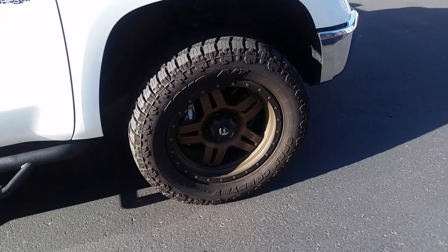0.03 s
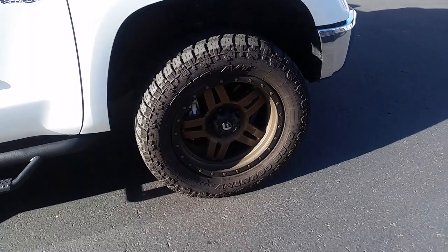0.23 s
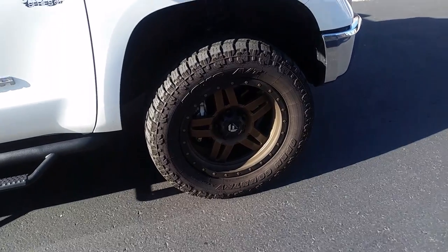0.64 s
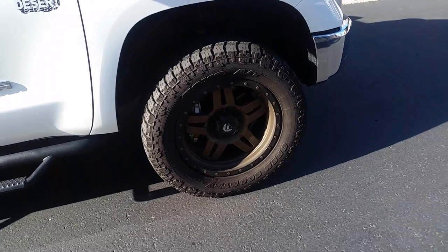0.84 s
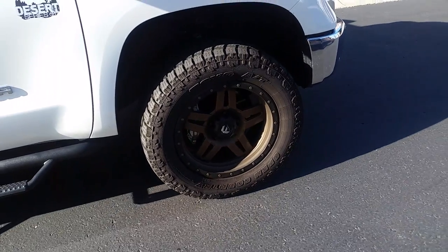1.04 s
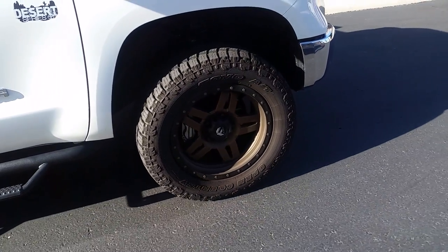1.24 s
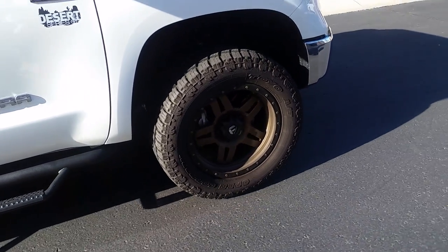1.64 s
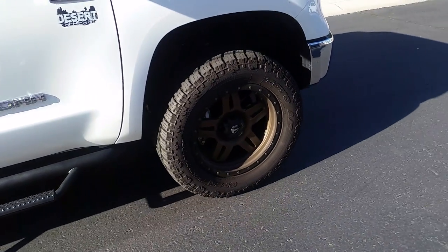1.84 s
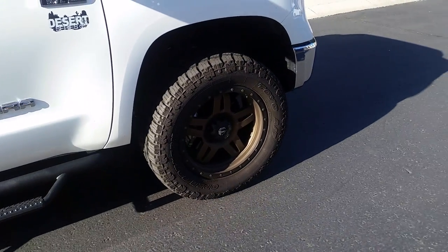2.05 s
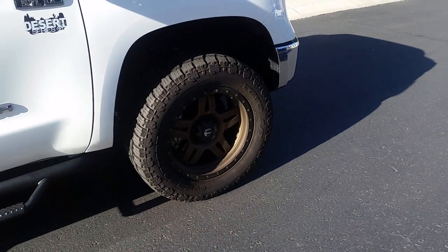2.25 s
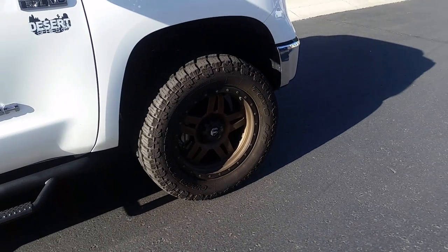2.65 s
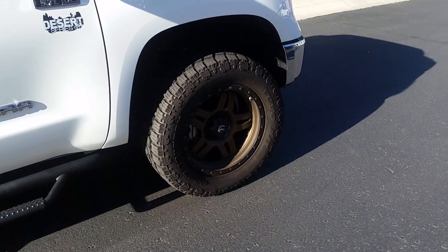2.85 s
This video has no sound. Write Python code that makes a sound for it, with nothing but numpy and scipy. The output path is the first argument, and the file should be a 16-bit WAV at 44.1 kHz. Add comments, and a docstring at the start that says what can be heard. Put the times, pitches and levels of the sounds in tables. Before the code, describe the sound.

A loose metal joint clunks once at a pickup's front wheel. Heard close by outdoors over the idling engine, wind first pops on the microphone, then the tyre scrubs briefly and the suspension thuds before the rattling clunk.

```python
"""A loose metal joint clunks and rattles out at the front wheel of a pickup creeping over asphalt.
Heard from beside the wheel, over the idling engine: exhaust hum, rumble, fan rush, thin hiss.
First grit snaps and wind puffs pop on the microphones; then the tyre scrubs and the suspension thuds.
Dense metal contacts ring the joint, and the running noise sinks."""
import sys
import numpy as np
from scipy import signal
from scipy.fft import rfft, irfft
from scipy.io import wavfile
from scipy.ndimage import uniform_filter1d, minimum_filter1d

SR = 44100
rng = np.random.default_rng(int(sys.argv[2]) if len(sys.argv) > 2 else 0)


def dump_mix(stems):
    """Bounce the given channels to the path in sys.argv[1] as a 16-bit WAV at rate SR."""
    frames = np.atleast_2d(stems).T  # one column per channel
    limited = np.clip(frames, -1, 1)  # hard clip at full scale
    pcm = np.round(limited * 32767).astype(np.int16)
    wavfile.write(sys.argv[1], SR, pcm)


N = 132300
T = np.arange(N) / SR

# stereo image of engine, eddies and grit: (frequency [Hz], L-R correlation [-])
AMBIENT_IMAGE = [(60, 0.87), (120, 0.89), (240, 0.94), (480, 0.91), (950, 0.84), (1890, 0.21), (3770, 0.32),
                 (7520, -0.52), (15000, 0.62)]
# stereo image of scrub, suspension and joint: (frequency [Hz], L-R correlation [-])
WHEEL_IMAGE = [(60, 0.69), (130, 0.95), (290, 0.7), (640, 1), (1410, 0.63), (3100, -0.0049), (6820, -0.058),
               (15000, -0.11)]


def from_db(db):
    """Decibels to gain."""
    return 10 ** (np.asarray(db) / 20)


def unit_rms(x):
    """Scale to rms 1."""
    return x / np.sqrt(np.mean(x ** 2) + 1e-20)


def in_time(rows):
    """Time table, read at every sample."""
    return np.interp(T, *np.transpose(rows))


def at_bins(rows):
    """Table over log frequency, read at every FFT bin."""
    hz, value = np.transpose(rows)
    return np.interp(np.log(np.arange(N // 2 + 1) * SR / N + 1e-3), np.log(hz), value)


def colour(x, spectrum):
    """Minimum-phase filter with the given spectrum."""
    cepstrum = irfft(np.log(from_db(at_bins(spectrum))), N)
    cepstrum[1:N // 2] *= 2
    cepstrum[N // 2 + 1:] = 0
    return irfft(rfft(x) * np.exp(rfft(cepstrum)), N)


def butter(x, hz, kind, order=2):
    """High- or low-pass."""
    return signal.lfilter(*signal.butter(order, hz, kind, fs=SR), x + 1e-18)


def spread(pair, image):
    """Two independent signals to left and right with the given correlation."""
    correlation = np.clip(at_bins(image), -.99, .99)
    mid, side = rfft(pair)
    return irfft(np.sqrt(1 + correlation) * mid + np.sqrt(1 - correlation) * side * [[1], [-1]], N)


def noise(spectrum, image):
    """Coloured stereo noise, rms 1."""
    return unit_rms(colour(spread(rng.standard_normal((2, N)), image), spectrum))


def pan(left_over_right_db):
    """Constant-power left and right gains."""
    db = np.atleast_1d(left_over_right_db)
    gains = from_db(np.array([db, -db]) / 2)
    return gains / np.sqrt(np.sum(gains ** 2, axis=0))


def drift(corner_hz):
    """Slow random wander, rms 1."""
    hz = np.arange(N // 2 + 1) * SR / N
    return unit_rms(irfft(rfft(rng.standard_normal(N)) / (1 + (hz / corner_hz) ** 2), N))


def ring(x, hz, t60_s):
    """Resonator: a unit click gives a decaying sine of height 1."""
    r, w = from_db(-60 / (t60_s * SR)), 2 * np.pi * hz / SR
    return signal.lfilter([0, np.sin(w)], [1, -2 * r * np.cos(w), r * r], x + 1e-18)


def resonances(x, modes, t60_s):
    """Modes driven by x, levels relative to x."""
    return x.std() * sum(from_db(db) * unit_rms(ring(x, hz, t60_s)) for hz, db in modes)


def bell(centre_s, sigma_s):
    """Gaussian of height 1."""
    return np.exp(-.5 * ((T - centre_s) / sigma_s) ** 2)


def bursts(rows, attack_s=0.0014):
    """Power sum of decaying envelopes: (time [s], level [dB], t60 [s])."""
    power = 0
    for s, db, t60_s in rows:
        rise = np.clip((T - s) / attack_s, 0, 1)
        power += (rise * from_db(db - 60 * np.maximum(T - s, 0) / t60_s)) ** 2
    return np.sqrt(power)


def rumble():
    """Low noise of the running truck."""
    spectrum = [(15, -55), (28, -6), (45, -13), (62, -4.5), (85, 0.5), (113, -1), (150, -6.5), (200, -10.5),
                (270, -12.5), (380, -18.5), (500, -25.5), (800, -55)]  # (frequency [Hz], density [dB])
    levels = [(0, -29.5), (1.7, -34.5), (2.05, -27), (2.4, -29), (2.65, -30.5), (2.8, -39.5), (3, -35)]  # (time [s], level [dB])
    return noise(spectrum, AMBIENT_IMAGE) * from_db(in_time(levels))


def exhaust():
    """Hum on multiples of the firing rate, each fluttering in level and phase."""
    firing = [(0, 43.29), (.9, 43.29), (1.3, 42.24), (1.8, 41.8), (2.1, 41.81), (2.5, 44.36), (3, 45.3)]  # (time [s], firing rate [Hz])
    orders = [(1, -19), (2, -0.5), (3, -15), (4, -17), (5, -25.5), (6, -22), (7, -26), (8, -31.5), (9, -24),
              (10, -29), (11, -45)]  # (multiple of firing rate [-], level [dB])
    levels = [(0, -31.5), (.5, -28.5), (.9, -31.5), (1.8, -26.5), (2.3, -30), (2.65, -32.5), (2.9, -32),
              (3, -40.5)]  # (time [s], level [dB])
    firing_phase = 2 * np.pi * np.cumsum(in_time(firing)) / SR
    hum = 0
    for order, db in orders:
        flutter = 0.04 if round(order) == 2 else 0.21
        angle = round(order) * firing_phase + rng.uniform(0, 2 * np.pi)
        in_phase = (1 + flutter * drift(24)) * np.sin(angle)
        quadrature = flutter * drift(4.1) * np.cos(angle)
        hum += from_db(db) * (in_phase + quadrature)
    return np.sqrt(2) * hum * from_db(in_time(levels)), firing_phase


def fan(firing_phase):
    """Rush of fan and belts with engine bay resonances, throbbing with the firing; thin hiss on top."""
    rush_spectrum = [(240, -24.5), (400, 5.5), (416, -9.5), (615, -6), (798, -2), (863, -5.5), (996, -6),
                     (1380, -3.5), (1530, -8), (2070, -5), (2380, -7.5), (2610, -6.5), (3480, -15.5),
                     (3810, -14), (4570, -16), (5010, -26), (6170, -32.5), (7400, -55.5), (9000, -57.5),
                     (11700, -58), (19800, -120)]  # (frequency [Hz], density [dB])
    hiss_spectrum = [(4000, -63), (7500, -31), (9500, -17), (11000, -7.5), (12500, 1.5), (13800, 5.5),
                     (15000, 10.5), (16000, -5)]  # (frequency [Hz], density [dB])
    levels = [(0, -39), (.5, -40), (1.2, -41), (2.45, -39.5), (2.62, -40), (2.75, -46), (3, -47)]  # (time [s], level [dB])
    bay_modes = [(398, 4.7, -57.5), (866, 12, -58), (1420, 46, -49.5), (2050, 23, -53), (2680, 67, -57.5)]  # (frequency [Hz], bandwidth [Hz], level at peak rush [dB])
    throb_depth, rush_flicker_db = 0.12, 1.02
    hiss_re_rush_db, hiss_flicker_db = -3, 1.8
    rush_db = in_time(levels)
    rush = noise(rush_spectrum, AMBIENT_IMAGE) * from_db(rush_db)
    air = spread(rng.standard_normal((2, N)), AMBIENT_IMAGE)
    bay = sum(from_db(db) * unit_rms(ring(air, hz, t60_s=np.log(1000) / (np.pi * width_hz)))
              for hz, width_hz, db in bay_modes)
    rush += bay * from_db(rush_db - rush_db.max())
    rush += throb_depth * np.sin(firing_phase) * butter(rush, 3600, "low")
    hiss = noise(hiss_spectrum, AMBIENT_IMAGE)
    hiss *= from_db(rush_db + hiss_re_rush_db + hiss_flicker_db * drift(30))
    return rush * from_db(rush_flicker_db * drift(45)) + hiss


def wind_puffs():
    """Pointed pressure dips at a microphone port, swung back by its bass cut; brief eddies follow."""
    puffs = [(0.6038, 1, 0.0015, -19), (0.6732, 15, 0.00076, 31), (0.6785, 1.5, 0.0012, 32),
             (0.7026, 12, 0.0011, 32), (0.7077, 4, 0.0013, 32), (0.724, 0.5, .001, 36),
             (.7690, -7, 0.00093, 30), (.7726, 8, 0.00098, 38)]  # (time [s], level [dB], width [s], pan L-R [dB])
    eddy_spectrum = [(20, 4), (60, 1.5), (150, 0), (400, -15), (1000, -28), (3500, -32.5), (7000, -55.5)]  # air fluttering in the port: (frequency [Hz], density [dB])
    eddy_re_puff_db, eddy_t60_s = -17, 0.043
    dips = eddy_envelope = 0
    for s, db, width_s, pan_db in puffs:
        dips -= from_db(db) * pan(pan_db) / (1 + .5 * ((T - s) / width_s) ** 2) ** 2
        eddy_envelope += pan(pan_db) * bursts([(s, db + eddy_re_puff_db, eddy_t60_s)])
    pops = butter(butter(dips, 79, "high"), 34, "high", order=1)
    return pops + noise(eddy_spectrum, AMBIENT_IMAGE) * eddy_envelope


def microphone_crackle():
    """The left microphone crackles under the strongest puffs."""
    ticks = [(.6748, -2), (.6787, -4), (.6815, -12), (.7072, -6), (.7255, -17)]  # (time [s], peak [dB])
    spectrum = [(200, -8), (900, 19), (2000, 4), (4000, -0.5), (6500, -19.5), (15000, -49)]  # (frequency [Hz], gain [dB])
    sample = np.arange(N)
    clicks = -pan(29) * sum(from_db(db) * (sample == int(s * SR)) for s, db in ticks)
    impulse_peak = np.abs(colour(sample == 0, spectrum)).max()
    return colour(clicks, spectrum) / impulse_peak


def grit(time_s=.379, level_db=-16.5, t60_s=0.016):
    """A piece of grit snaps under the tyre."""
    spectrum = [(300, -29), (900, -18), (1400, 1), (2200, -4), (3000, -20), (5000, -43), (16000, -50)]  # (frequency [Hz], density [dB])
    return pan(17) * noise(spectrum, AMBIENT_IMAGE) * bursts([(time_s, level_db, t60_s)])


def tyre_scrub():
    """Rubber scrubs on asphalt: one short swell of noise."""
    spectrum = [(100, -30), (500, 0), (1050, 4.5), (1700, -6), (2600, 1.5), (5000, -11.5), (8000, -39),
                (16000, -33)]  # (frequency [Hz], density [dB])
    return from_db(-31) * bell(centre_s=1.872, sigma_s=0.022) * noise(spectrum, WHEEL_IMAGE)


def suspension():
    """Soft pushes set tyre and chassis booming and the struts shuddering."""
    thuds = [(1.8947, -11, 0.00076, -32), (1.904, -13, 0.00091, -33), (1.915, -5, 0.0022, -28.5),
             (1.9878, -18, 0.0014, -27), (1.9953, -17, 0.00087, -22), (2.045, -15.5, 0.0017, -33),
             (2.173, -39, 0.0018, -30), (2.225, -29, 0.00051, -35.5), (2.453, -19.5, 0.00049, -29),
             (2.51, -13.5, 0.0014, -36)]  # (time [s], push [dB], contact sigma [s], shudder [dB])
    chassis_modes = [(62, -23, .1), (93, -2, 0.13), (144, -1.5, 0.083), (190, 1, 0.069), (235.6, -1, 0.11),
                     (377, -28, 0.095)]  # (frequency [Hz], level [dB], t60 [s])
    shudder_spectrum = [(60, -10), (200, -0.5), (420, -18), (620, -12), (900, -11), (1400, -24),
                        (2500, -44), (8000, -70)]  # (frequency [Hz], density [dB])
    strut_modes = [(545, -24), (578, -8.5), (645, -10), (752, -10.5), (965, -16)]  # (frequency [Hz], level re shudder [dB])
    shudder_t60_s = 0.14
    pushes = sum(from_db(db) * bell(s, sigma_s) / (sigma_s * SR * np.sqrt(2 * np.pi))
                 for s, db, sigma_s, _ in thuds)
    boom = -sum(from_db(db) * ring(pushes, hz, t60_s) for hz, db, t60_s in chassis_modes)
    shudder = noise(shudder_spectrum, WHEEL_IMAGE)
    shudder *= bursts([(s, db, shudder_t60_s) for s, _, _, db in thuds])
    hollow = resonances(shudder, strut_modes, t60_s=0.088)
    return butter(boom + shudder + hollow, 50, "high")


def loose_joint():
    """Each blow is a dense rattle of contacts that rings the joint, with bright snap and diffuse tail."""
    blows = [(2.4532, -23.5, 0.035, -24.5), (2.4751, -14, 0.13, -13.5), (2.489, -23, 0.098, -30),
             (2.507, -18.5, 0.068, -33), (2.558, -25.5, .12, -34.5)]  # (time [s], level [dB], t60 [s], snap [dB])
    joint_modes = [(586.8, -42.5), (1028, -54), (1281, -41), (1324, -44), (1976, -53), (2089, -39.5),
                   (2245, -44), (2476, -45.5), (2546, -44), (2681, -44), (2918, -64), (3042, -46),
                   (3101, -49.5), (3424, -50)]  # (frequency [Hz], relative level [dB])
    snap_modes = [(13740, -14), (14300, -11)]  # (frequency [Hz], level re snap [dB])
    clang_spectrum = [(180, -37), (300, -18), (346, -15), (594, -1), (790, -12), (1020, 1), (1190, -20),
                      (1320, -0.5), (1780, -9.5), (2170, -5.5), (3570, -3.5), (5240, -26.5), (5790, -21.5),
                      (7480, -36.5), (9000, -40), (11700, -57), (19800, -120)]  # (frequency [Hz], density [dB])
    snap_spectrum = [(1200, -25.5), (2200, -3), (3400, -1.5), (4600, -7), (5300, -34), (8000, -38.5),
                     (10500, -14), (12000, -10), (13500, -2.5), (14300, 2.5), (15600, -2.5), (17000, -32)]  # (frequency [Hz], density [dB])
    tail_spectrum = [(180, -19), (300, -9), (410, -7.5), (778, -9), (885, -6), (1440, -1.5), (1780, -12.5),
                     (2570, -3.5), (4480, -17), (5090, -27), (9000, -39), (11700, -77), (19800, -120)]  # (frequency [Hz], density [dB])
    contacts_per_s, size_spread_db = 1800, 3
    snap_t60_s, tail_t60_s = 0.088, 0.35
    sizes = from_db(size_spread_db * np.minimum(rng.exponential(1, (2, N)), 3))
    signs = rng.choice([-1, 1], (2, N))
    hits = rng.random((2, N)) < contacts_per_s / SR
    contacts = spread(sizes * signs * hits, WHEEL_IMAGE)
    force = bursts([(s, db, t60_s) for s, db, t60_s, _ in blows])
    clang = unit_rms(colour(contacts, clang_spectrum)) * force
    ringing = sum((-1) ** k * from_db(db) * unit_rms(ring(contacts * force, hz, t60_s=0.12))
                  for k, (hz, db) in enumerate(joint_modes))
    ringing = unit_rms(ringing) * clang.std()
    snap = unit_rms(colour(contacts, snap_spectrum))
    snap *= bursts([(s, db, snap_t60_s) for s, _, _, db in blows])
    snap += resonances(snap, snap_modes, t60_s=0.06)
    tail = noise(tail_spectrum, WHEEL_IMAGE) * bursts([(s, db, tail_t60_s) for s, db, _, _ in blows])
    return from_db(-0.5) * clang + from_db(-2) * ringing + snap + from_db(-6.5) * tail


def scene():
    """The truck through two unlike microphones (the right far brighter), plus the wind on them."""
    balance = [(60, 1), (110, 1), (200, 1), (380, 3.5), (700, 4), (1290, 0.5), (2380, -1), (4400, 6.5),
               (8120, -3.5), (15000, -28)]  # (frequency [Hz], L-R [dB])
    hum, firing_phase = exhaust()
    engine = hum + fan(firing_phase) + rumble()
    truck = engine + suspension() + tyre_scrub() + loose_joint() + grit()
    picked_up = irfft(rfft(truck) * np.sqrt(2) * pan(at_bins(balance)), N)
    return picked_up + wind_puffs() + microphone_crackle()


def record(dry):
    """Fast stereo-linked limiter, a brief silence at the start, steep low-pass."""
    limit_db, release_db_per_s = -.8, 172
    start_s, cutoff_hz = .057, 15900
    over_db = np.maximum(20 * np.log10(np.abs(dry).max(axis=0) + 1e-9) - limit_db, 0)
    held_db = np.maximum.accumulate(over_db + release_db_per_s * T) - release_db_per_s * T
    gain = from_db(uniform_filter1d(minimum_filter1d(-held_db, size=129), size=129))
    lowpass = signal.ellip(12, .1, 80, cutoff_hz, fs=SR, output="sos")
    return signal.sosfilt(lowpass, dry * gain * (T > start_s))


dry = scene()
out = record(dry)
dump_mix(out)
```